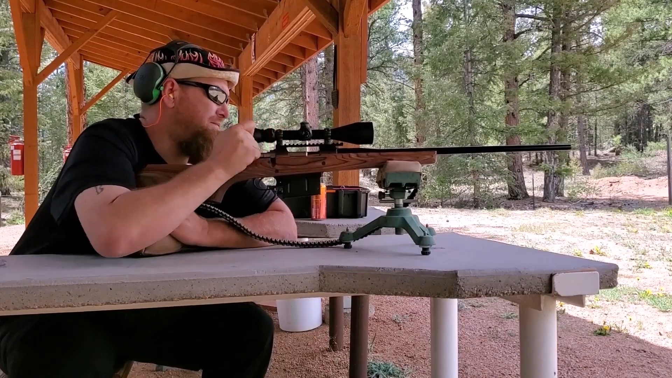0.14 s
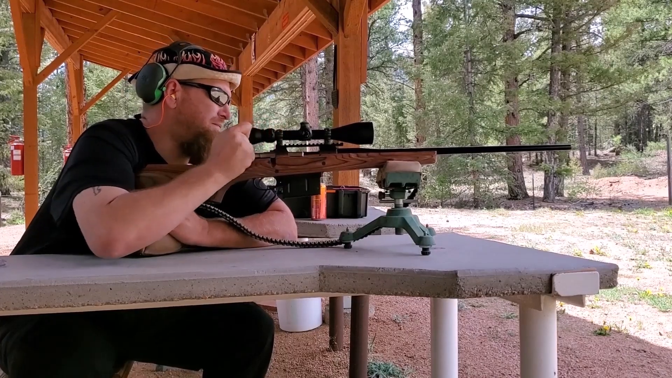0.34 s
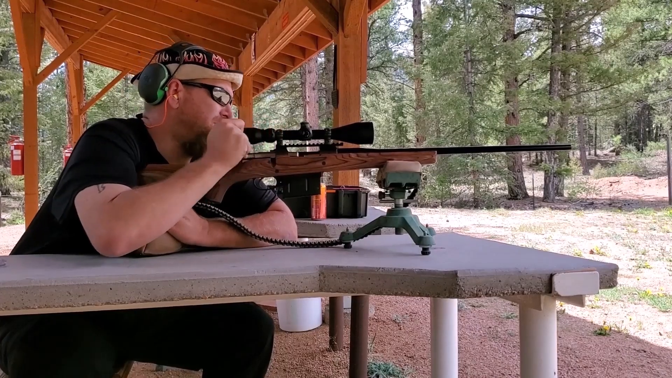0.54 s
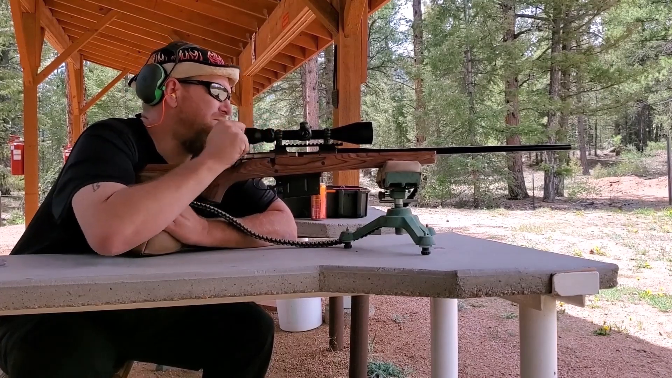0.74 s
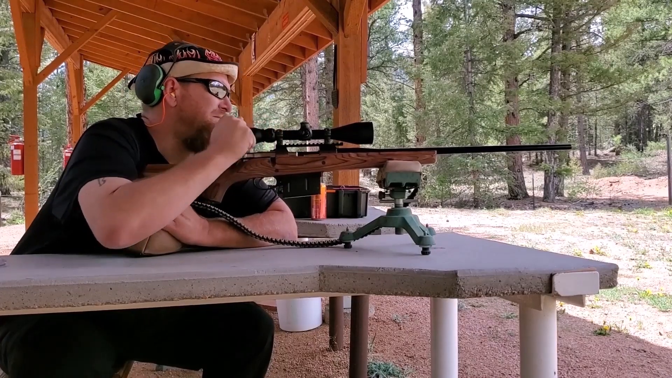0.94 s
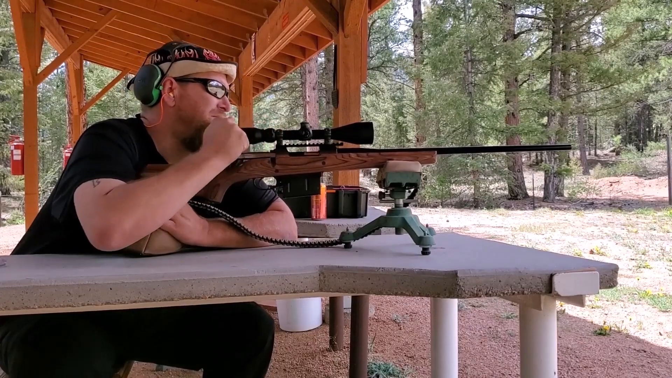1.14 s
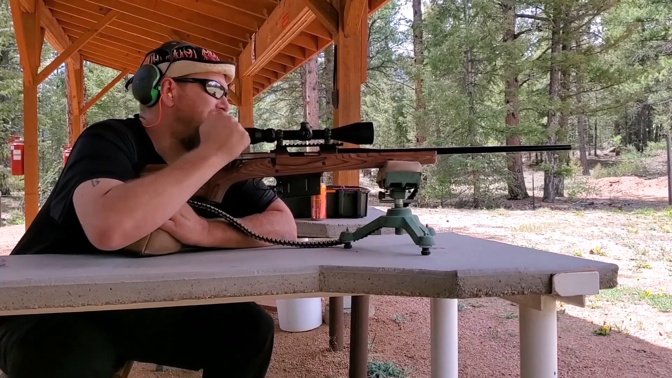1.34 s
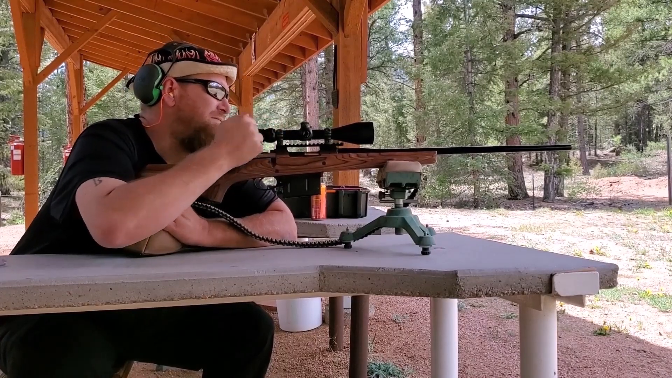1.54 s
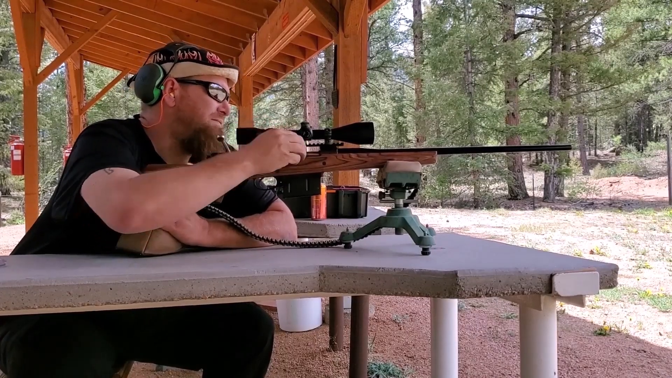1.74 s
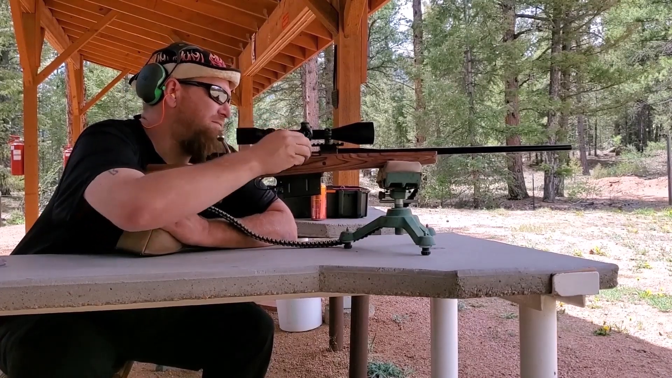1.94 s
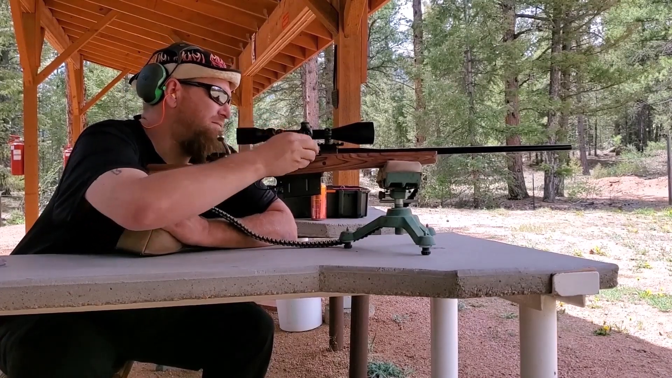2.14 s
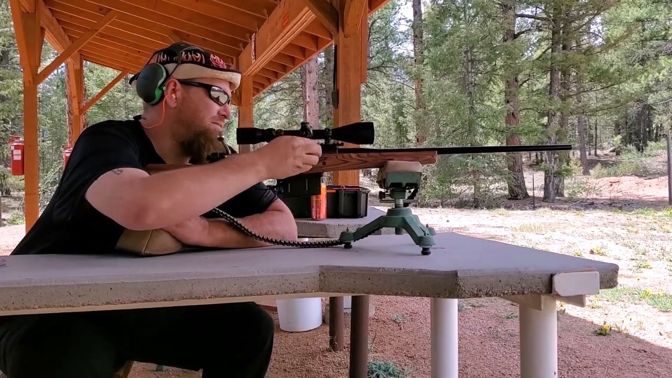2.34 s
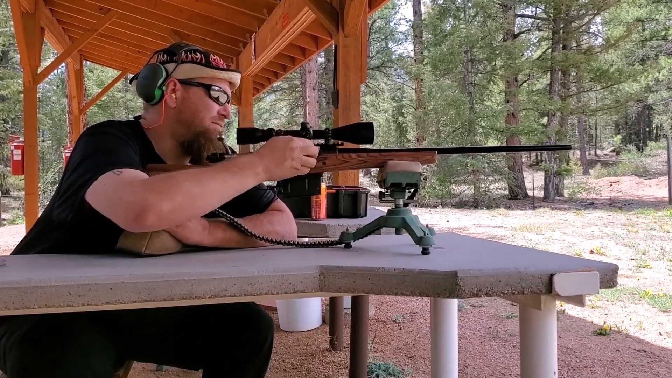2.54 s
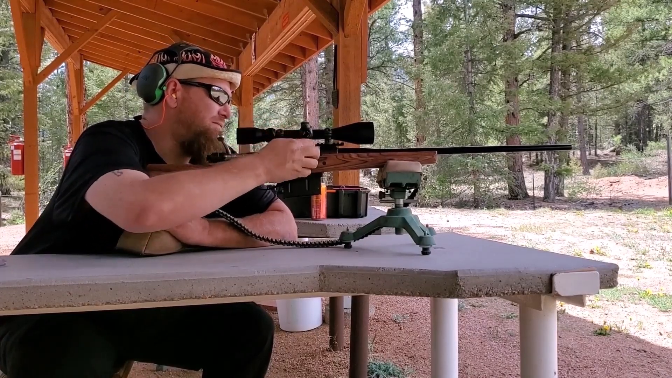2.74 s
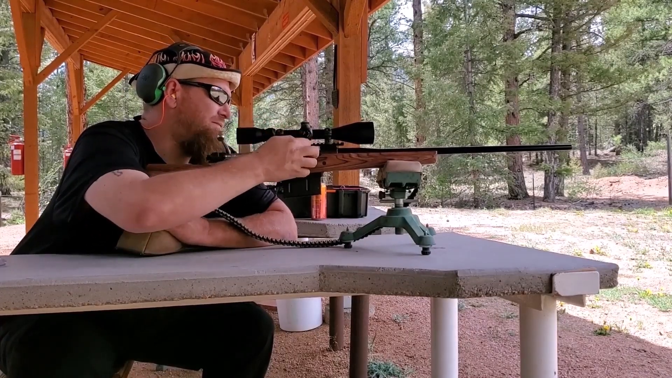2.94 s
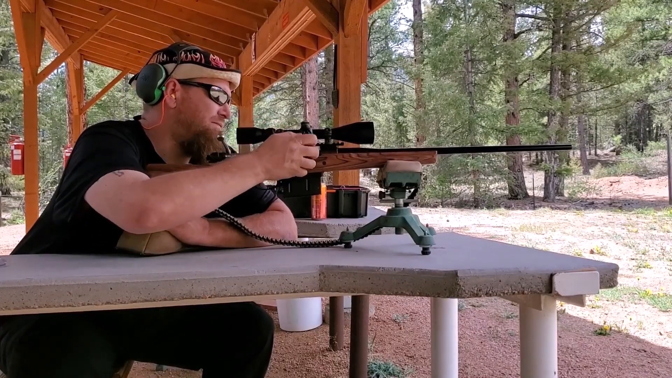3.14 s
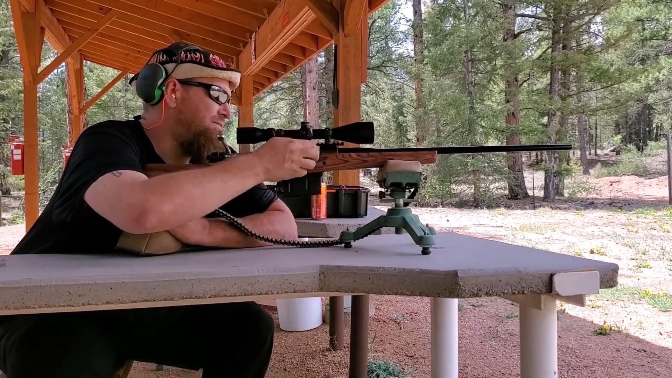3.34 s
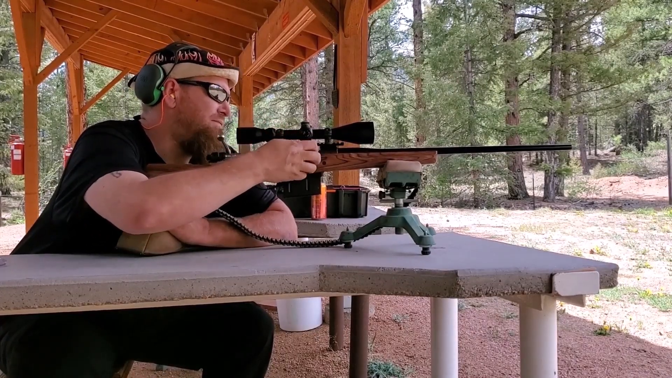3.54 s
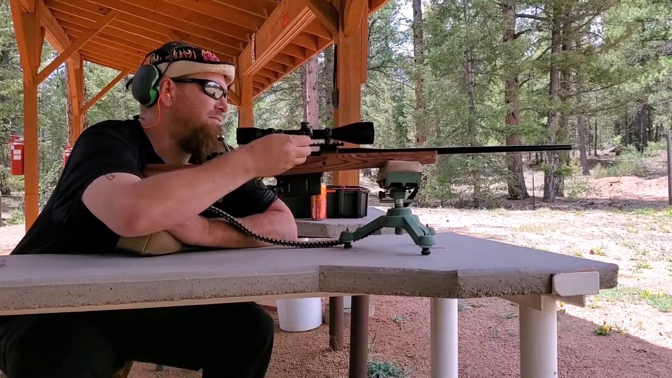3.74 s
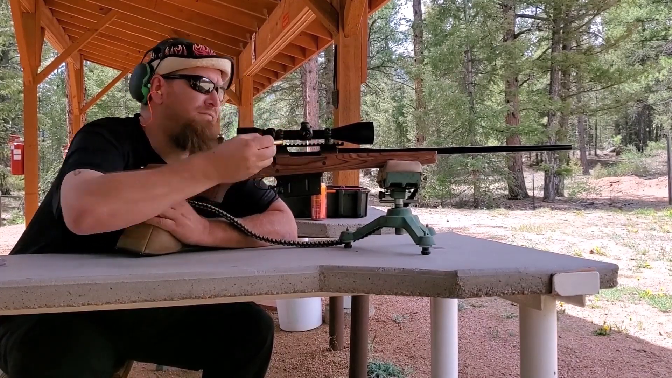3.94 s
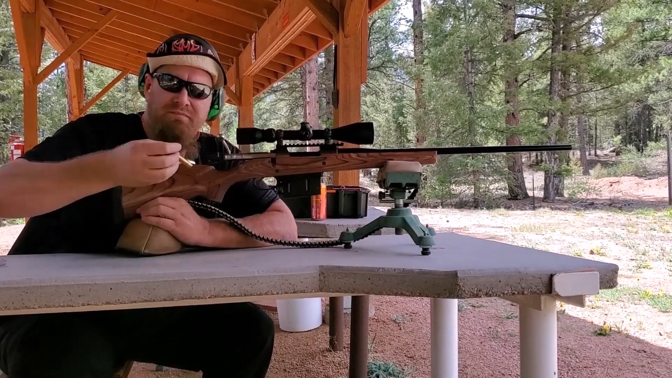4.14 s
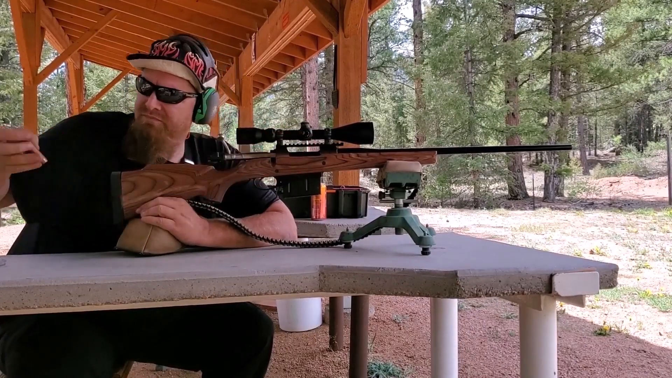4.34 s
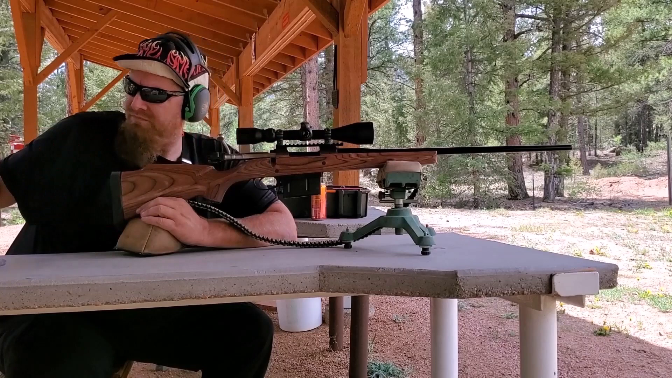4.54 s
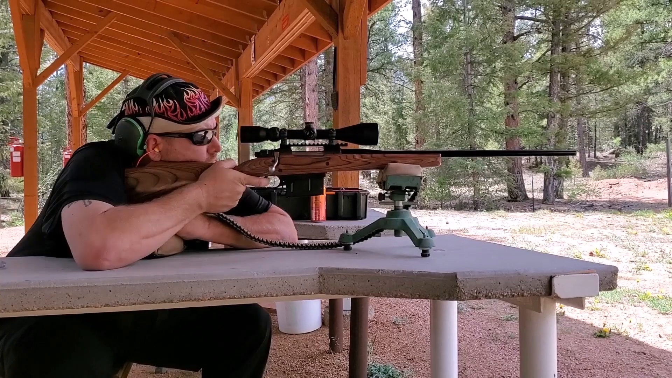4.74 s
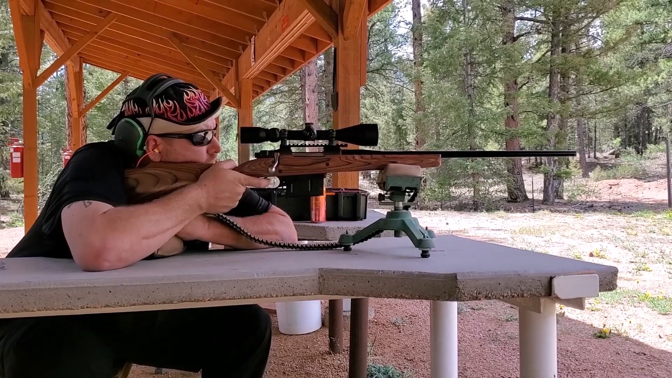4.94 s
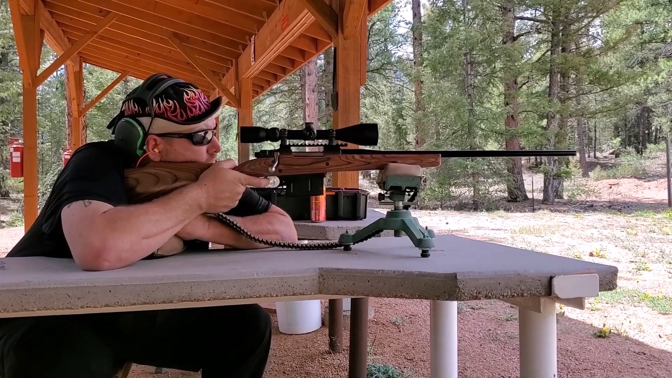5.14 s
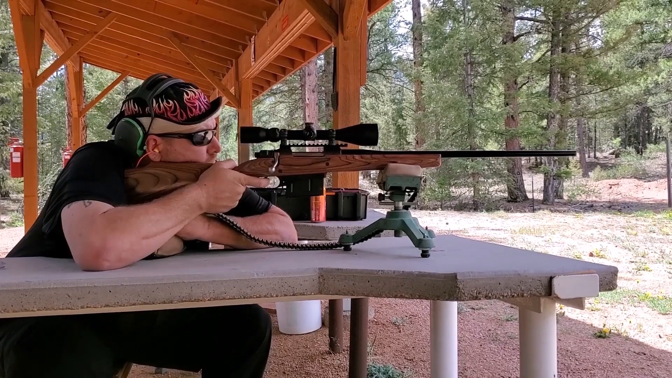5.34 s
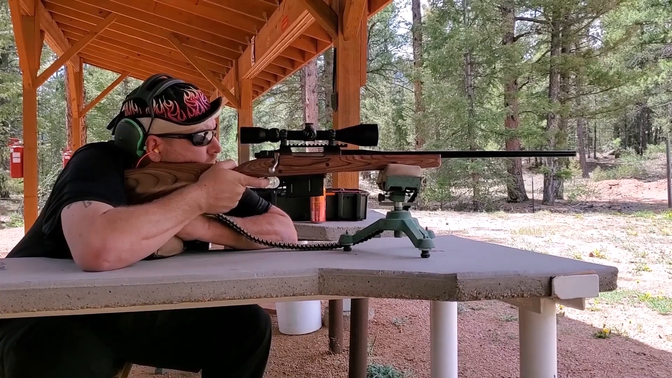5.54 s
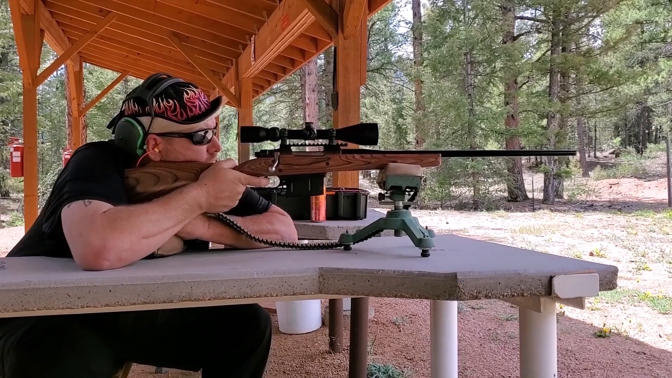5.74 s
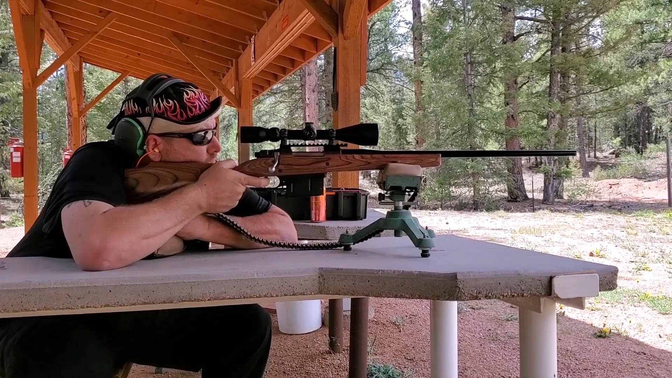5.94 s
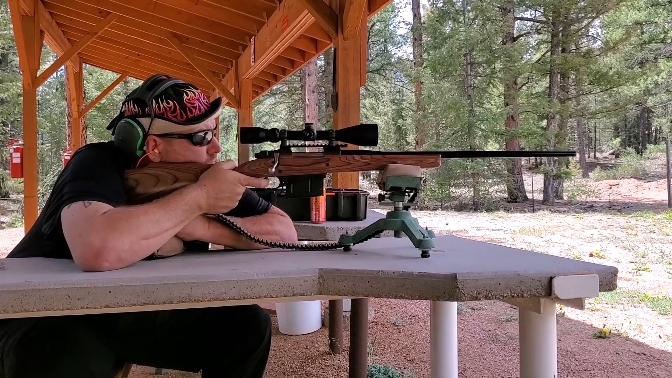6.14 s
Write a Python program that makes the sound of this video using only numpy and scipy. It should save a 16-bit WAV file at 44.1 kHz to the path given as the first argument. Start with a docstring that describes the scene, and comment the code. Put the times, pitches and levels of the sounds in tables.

```python
"""A light breeze in the pines, then steel clicking close by: a bolt-action rifle is worked by hand.
On a bench under the shelter of a range its bolt slides, clicks, knocks in the stock and rings thinly:
shaped noise and damped modes. Then one shot: a pressure swing and crack, noise and timber modes
rattling round the shelter, slower noise rolling from the trees, and a sharp smack from down range.
Wind rumble, treetop rush and faint hiss, all coloured noise, lie under everything."""
import sys
import numpy as np
from scipy import signal
from scipy.fft import rfft, irfft, next_fast_len
from scipy.io import wavfile
from scipy.ndimage import map_coordinates

SR = 44100
rng = np.random.default_rng(int(sys.argv[2]) if len(sys.argv) > 2 else 0)


def bounce(signal):
    """Save signal as a 16-bit WAV file at the path given by the first command-line argument."""
    frames = np.transpose(np.atleast_2d(signal))
    limited = np.clip(frames, -1, 1)
    pcm = np.round(limited * 32767).astype(np.int16)
    wavfile.write(sys.argv[1], SR, pcm)


N = 277157
SHOT_S, SMACK_S = 4.8553, 5.1424

# Colour of steel on steel. Each row: frequency in Hz, relative level in dB per Hz.
STEEL_COLOUR = [(240, -42.5), (400, -15), (536, -25.5), (753, -1.5), (1130, -18.5), (1350, -10.5),
                (2290, -22), (3120, -9), (3990, -10.5), (7400, -18.5), (8630, -21), (9610, -31.5),
                (10200, -20.5), (15000, -24.5), (16000, -34)]
# Modes of the thin metal. Each row: frequency in Hz, relative level in dB, 60 dB decay time in seconds.
THIN_METAL = [(8870, -16.5, 0.17), (9470, 0.5, 0.1), (9560, -11.5, 0.062), (11600, -11.5, 0.17),
              (15235, -7.5, .12), (15420, -13, .06)]
# Left-right likeness in open air. Each row: frequency in Hz, likeness from -1 to 1.
AIR_LIKENESS = [(60, 0.6), (200, 0.7), (400, 0.3), (700, 0.4), (1300, -0.2), (2500, 0.1)]
# Left-right likeness under the roof. Each row: frequency in Hz, likeness from -1 to 1.
ROOF_LIKENESS = [(100, 1), (640, 0.36), (1200, -0.53), (3000, 0.24)]


def amp(db):
    """Decibels to gain."""
    return 10 ** (np.asarray(db) / 20)


def unit(x):
    """Scale to rms 1."""
    return x / np.sqrt(np.mean(x ** 2) + 1e-20)


def along(points, hz):
    """Read (Hz, value) points on a log frequency axis."""
    f, value = np.transpose(points)
    return np.interp(np.log(hz + 1), np.log(f + 1), value)


def curves(rows):
    """Give one value per sample for each column after the time."""
    s, *columns = np.transpose(rows)
    return [np.interp(np.arange(N) / SR, s, column) for column in columns]


def wobble(rate):
    """Draw a smooth random curve with rate knots a second."""
    knots = rng.standard_normal(int(N * rate / SR) + 4)
    return map_coordinates(knots, [np.arange(N) * rate / SR])


def add(track, s, sound):
    """Lay a sound into the track at time s."""
    part = track[..., round(s * SR):][..., :sound.shape[-1]]
    part += sound[..., :part.shape[-1]]


def noise(spectrum, alike, size):
    """Stereo noise of rms 1: mid and side are mixed to give each frequency its left-right likeness."""
    m = next_fast_len(size)
    hz = np.fft.rfftfreq(m, 1 / SR)
    turn = np.arccos(np.clip(along(alike, hz), -1, 1)) / 2
    coloured = rfft(rng.standard_normal((2, m))) * amp(along(spectrum, hz))
    mid, side = irfft(coloured * [np.cos(turn), np.sin(turn)], m)[:, :size]
    return unit(np.array([mid + side, mid - side]))


def dying(x, t60):
    """Fade each frequency of x at its own speed, as air and surfaces absorb it."""
    hz, t, z = signal.stft(x, SR, nperseg=256)
    faded = z * amp(-60 * t / along(t60, hz)[:, None])
    return signal.istft(faded, SR, nperseg=256)[1][:, :x.shape[1]]


def ringing(modes, t, spread):
    """Sum damped modes, struck at new strengths and phases and slightly new pitches."""
    total = 0
    for hz, db, t60 in modes:
        strength, detune, phase = rng.standard_normal(3)
        decay = amp(db + 2 * strength - 60 * t / t60)
        total = total + decay * np.sin(2 * np.pi * (hz * (1 + spread * detune) * t + phase))
    return total


def breeze(rumble_db=2.5, hiss_db=-82, buffet_db=2.0, flutter_db=1.24):
    """Air buffets each microphone port in its own way and rushes in the pines, over a faint steady hiss."""
    # Wind rumble. Each row: time in seconds, level in dB before the rumble trim.
    gusts = [(0.0, -71.5), (0.93, -75.5), (1.38, -67), (2.9, -75.5), (4.41, -67), (4.55, -73.5),
             (5.53, -78.5), (6.28, -72)]
    # Colours of the rumble, the pines and the hiss. Each row: frequency in Hz, relative level in dB per Hz.
    rumble_colour = [(15, -34), (30, -12), (60, 0.5), (85, 0), (140, -11), (260, -32), (500, -78)]
    pine_colour = [(60, -26), (110, -7), (180, 0), (270, -3.5), (450, -1), (760, -5), (1150, -16.5),
                   (1550, -18), (2300, -33.5), (3500, -31), (5000, -35), (8000, -63.5)]
    hiss_colour = [(2000, -1.5), (4000, -15.5), (5600, -4), (6600, 5.5), (7500, -17), (9000, -10),
                   (11000, -2.5), (15500, -5.5)]
    rush_db, lull_s, lull_db_per_s = -59.5, 2.5, 2.5  # an even rush, then the breeze dies down

    gust_db, = curves(gusts)
    buffets = buffet_db * np.array([wobble(13.0), wobble(9.2)])  # left, right
    low = amp(gust_db + rumble_db + buffets) * noise(rumble_colour, AIR_LIKENESS, N)

    pines_db = rush_db - lull_db_per_s * np.maximum(np.arange(N) / SR - lull_s, 0)
    rush = amp(pines_db + flutter_db * wobble(8.0)) * noise(pine_colour, AIR_LIKENESS, N)
    hiss = amp(hiss_db) * noise(hiss_colour, AIR_LIKENESS, N)
    return low + rush + hiss


def forest(level_db=-23, build_s=0.19, lag_s=.0005, roll_db=0.4):
    """Trunks down range, off to the right, send the blast back ever later and duller."""
    # Colour of the trees' answer. Each row: frequency in Hz, relative level in dB per Hz.
    tree_colour = [(100, -27.5), (300, -18.5), (550, -9.5), (790, -3), (1250, -8.5), (2000, -6.5),
                   (2900, -6.5), (4300, -10), (7000, -24.5), (14000, -33.5)]
    # How long the trees hold it. Each row: frequency in Hz, 60 dB decay time in seconds.
    tree_t60 = [(150, 1.1), (800, 1.465), (2000, 1.158), (4500, 0.71), (9000, 0.75), (15000, 0.36)]
    alike = [(200, 0.61), (800, 0.31), (2000, 0.33), (5000, .1)]  # (Hz, left-right likeness)

    out, t = np.zeros((2, N)), np.arange(SR * 3 // 2) / SR
    trees = dying(noise(tree_colour, alike, len(t)), tree_t60)
    build = 1 - np.exp(-(t / build_s) ** 2)
    left, right = amp(level_db) * build * trees
    add(out[0], SHOT_S + lag_s, left)
    add(out[1], SHOT_S, right)
    return out * amp(roll_db * wobble(27))


def shelter(bench_db=-18, bench_t60=0.3, roof_db=-15, roof_s=.0155, hold_s=0.038, drain_db=3,
            timber_db=-26, clump_db=1.0):
    """Bench and posts answer at once, the roof a little later, and the whole shelter rings."""
    # Colour of the blast under the roof. Each row: frequency in Hz, relative level in dB per Hz.
    blast_colour = [(40, -44), (100, -22.5), (200, -14.5), (290, -11), (480, -12), (620, -8.5), (780, -6),
                    (1050, -5.5), (1220, -10.5), (1850, -10.5), (4000, -17.5), (5900, -21.5), (6600, -26.5),
                    (16000, -30.5)]
    # How long the shelter holds it. Each row: frequency in Hz, 60 dB decay time in seconds.
    roof_t60 = [(100, 0.56), (500, 0.49), (2000, 0.54), (6000, 0.51), (14000, .28)]
    # Modes of the timber. Each row: frequency in Hz, relative level in dB, 60 dB decay time in seconds.
    timber = [(292.6, -11, .5), (394, -6, .45), (609, -3, 0.3), (688, -6.5, 0.16), (755, -1.5, 0.51),
              (970, -2, 0.31), (1120, -7, 0.22), (1288, -7.5, 0.45), (1790, -8, .18), (1840, -4, 0.42)]

    out, t = np.zeros((2, N)), np.arange(SR) / SR
    bench = amp(bench_db - 60 * t / bench_t60) * noise(blast_colour, ROOF_LIKENESS, len(t))
    add(out, SHOT_S, bench)
    # the roof keeps the sound bouncing for a moment before it drains away
    roof = dying(noise(blast_colour, ROOF_LIKENESS, len(t)), roof_t60)
    drain = amp(-drain_db * np.clip(t / hold_s - 1, 0, 1))
    bounces = (1 - np.exp(-t / 0.00076)) * drain
    add(out, SHOT_S + roof_s, amp(roof_db) * bounces * roof)
    add(out, SHOT_S + roof_s, amp(timber_db) * ringing(timber, t, spread=0.0011))
    return out * amp(clump_db * wobble(700))


def echoes():
    """Everything that answers the blast, near and far."""
    return shelter() + forest()


def smack(level_db=-18.5, lag_s=.0005, left_db=-4, length_s=0.0018, tail_db=-22, tail_t60=0.12):
    """A short bright smack from down range, likely the bullet on its target, scattered by the roof."""
    # (Hz, relative dB per Hz)
    colour = [(500, -28), (1650, -21.5), (2050, 0.5), (2600, -2), (3000, -10), (4200, -4.0),
              (5100, -16), (6000, -11.5), (9000, -28.5), (15000, -31.5)]
    out, t = np.zeros((2, N)), np.arange(SR // 5) / SR
    shape = np.exp(-(t / length_s) ** 4) + amp(tail_db - 60 * t / tail_t60)
    left, right = amp(level_db) * shape * noise(colour, [(1000, 1.0)], len(t))
    add(out[0], SMACK_S + lag_s, amp(left_db) * left)
    add(out[1], SMACK_S, right)
    return out


def slides(grain_db=4, rise_s=0.017, fade_s=0.025, catch_db=2.0):
    """Parts catch on tiny ridges: a light touch rubs dully, a firm one rasps and keeps thin metal singing."""
    # Moves of the hand, each sliding one part.
    # Each row: start in seconds, end in seconds, force in dB, how freely that part rings in dB.
    strokes = [(0.141, 0.234, -53.5, -12), (0.22, 0.292, -54, 3), (0.43, 0.467, -67, -28),
               (1.034, 1.092, -74, -24), (1.198, 1.274, -42.5, -24), (1.307, 1.396, -42.5, -8),
               (1.941, 2.056, -52, -3), (2.404, 2.472, -48.5, -21), (3.011, 3.092, -49, -17),
               (3.222, 3.318, -65.5, -11), (3.638, 3.80, -59, -28)]
    # Colour of the dull rub. Each row: frequency in Hz, relative level in dB per Hz.
    rub_colour = [(400, -20), (750, 7), (1100, -2.5), (1550, 2), (2300, -10.5), (3100, 0.5), (4300, -9),
                  (6000, -19), (8000, -30.5), (16000, -39)]
    firm_db, rub_db, rub_grows = -49.5, -48.5, .55  # a firm stroke, its rub, dB of rub per dB of force

    t = np.arange(N) / SR
    rasp, rub, sing = np.zeros((3, N))
    for start, end, force_db, free_db in strokes:
        rise = .5 + .5 * np.tanh((t - start) / rise_s)
        fade = .5 - .5 * np.tanh((t - end) / fade_s)
        push = rise * fade
        rasp += amp(force_db) * push
        rub += amp(rub_db + rub_grows * (force_db - firm_db)) * push
        sing += amp(force_db + free_db) * push

    ridges = unit(amp(grain_db * wobble(350) + catch_db * wobble(70)))
    metal = ringing(THIN_METAL, t[:SR // 5], spread=0)
    grit = ridges * rng.standard_normal((2, N))
    singing = unit(signal.fftconvolve(grit, metal[None], axes=1)[:, :N])
    rasping = rasp * noise(STEEL_COLOUR, ROOF_LIKENESS, N)
    rubbing = rub * noise(rub_colour, AIR_LIKENESS, N)
    return ridges * (rasping + rubbing) + sing * singing


def contacts():
    """Every blow as (s, snap dB, knock dB, ring dB): clicks leak into the wood, knocks into the steel."""
    # Steel snapping against steel.
    # Each row: start in seconds, snap level in dB, thin ring over the snap in dB, before the trims in clicks.
    snaps = [(0.172, -41, -20), (0.238, -38.5, 1), (1.06, -64, -25), (1.215, -28.5, -8),
             (1.235, -28.5, -30), (1.308, -34, -3), (1.317, -26, -15), (1.381, -31, -9), (1.389, -35, -18),
             (1.432, -42, -23), (1.944, -44, 4), (1.984, -46, -2), (2.399, -36, -30), (2.433, -26, -8),
             (2.65, -69, -30), (3.057, -33.5, -8), (3.129, -44.5, -21), (3.244, -54.5, -5),
             (3.275, -50, -22), (3.641, -30.5, -17), (3.781, -40, -16), (3.793, -29, -16)]
    # Parts bumping dully in the wooden stock. Each row: start in seconds, level in dB before the trims.
    bumps = [(0.145, -43.5), (0.201, -34.5), (1.028, -50), (1.197, -38), (1.207, -36.5), (1.257, -37),
             (1.293, -33), (1.343, -39), (2.785, -57), (3.074, -40.5), (3.515, -63), (3.75, -47)]
    click_in_wood_db, knock_in_steel_db = -11.5, -16  # how much reaches the other material
    knock_ring_db = -25  # dull knocks hardly ring the thin metal

    on_steel = [(s, db, db + click_in_wood_db, db + ring_db) for s, db, ring_db in snaps]
    in_wood = [(s, db + knock_in_steel_db, db, db + knock_ring_db) for s, db in bumps]
    return on_steel + in_wood


def clicks(snap_db=1, snap_t60=0.016, scatter_db=-8, scatter_t60=0.16, action_db=-9, knock_db=4, ring_db=1):
    """Contacts snap, ring action and thin steel, and knock the stock; bench and roof scatter the snap."""
    # Modes of the steel action, then of the wooden stock.
    # Each row: frequency in Hz, relative level in dB, 60 dB decay time in seconds.
    action_modes = [(3050, -1.5, 0.073), (3600, -1, 0.047), (3910, 1, 0.069), (4350, 0, 0.06),
                    (5430, -5, 0.055), (5920, -1, 0.067), (7320, -1.5, 0.054)]
    stock_modes = [(648.7, -6, 0.066), (759, -2.5, 0.11), (860, -5.5, 0.058), (1450, -13.5, 0.026)]

    out, t = np.zeros((2, N)), np.arange(SR // 4) / SR
    for s, snap, knock, ring in contacts():
        direct = amp(snap_db - 60 * t / snap_t60) * noise(STEEL_COLOUR, ROOF_LIKENESS, len(t))
        scatter = amp(scatter_db - 60 * t / scatter_t60) * noise(STEEL_COLOUR, AIR_LIKENESS, len(t))
        # each side hears its own mix of the metal's modes
        action = amp(action_db) * np.array([ringing(action_modes, t, spread=0.0092) for side in range(2)])
        thin = amp(ring + ring_db) * np.array([ringing(THIN_METAL, t, spread=0.0023) for side in range(2)])
        wood = amp(knock + knock_db) * ringing(stock_modes, t, spread=0.027)
        wood = wood * (1 - np.exp(-t / 0.0012))  # wood starts more softly
        onset = 1 - np.exp(-t / 0.00063)
        add(out, s, (amp(snap) * (direct + scatter + action) + wood + thin) * onset)
    return out


def blast(front_hz=830, front_db=-1, length_s=0.0016, crack_db=-11, crack_t60=0.002, lag_s=0.00027, left_db=-4):
    """The shock front: a crack and a hard swing of pressure, reaching the right side first."""
    out, t = np.zeros((2, N)), np.arange(SR // 20) / SR
    swing = amp(front_db) * np.cos(2 * np.pi * front_hz * t) * np.exp(-(t / length_s) ** 4)
    crack = amp(crack_db - 60 * t / crack_t60) * rng.standard_normal(len(t))
    front = swing + crack
    add(out[0], SHOT_S + lag_s, amp(left_db) * front)
    add(out[1], SHOT_S, front)
    return out


def scene():
    """The rifle stands slightly to the right of the microphone, in the breeze."""
    rifle = clicks() + slides() + blast() + echoes()
    lean = amp([[-.5], [.5]])  # left, right
    return rifle * lean + smack() + breeze()


def record(dry):
    """The level dips briefly before the shot; peaks are rounded off and the band is limited."""
    # Recording level. Each row: time in seconds, gain in dB.
    level = [(4.628, 3.5), (4.655, -16), (4.672, -20), (4.695, 0.5)]
    top_hz, ceiling = 16300, .85
    x = dry * amp(curves(level)[0])
    x = x / (1 + np.abs(x / ceiling) ** 6) ** (1 / 6)
    m = next_fast_len(N + SR // 2)
    passed = np.fft.rfftfreq(m, 1 / SR) < top_hz
    return irfft(rfft(x, m) * passed, m)[:, :N]


dry = scene()
out = record(dry)
bounce(out)
```